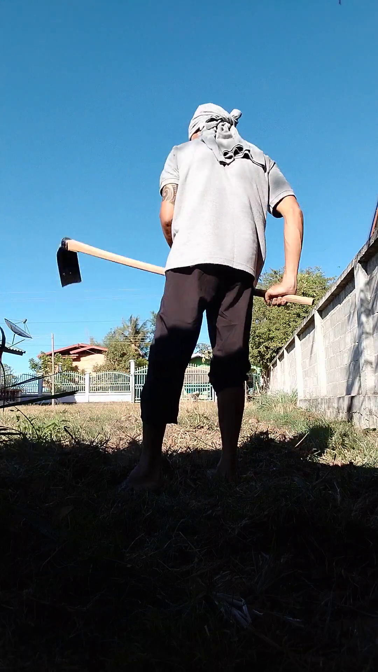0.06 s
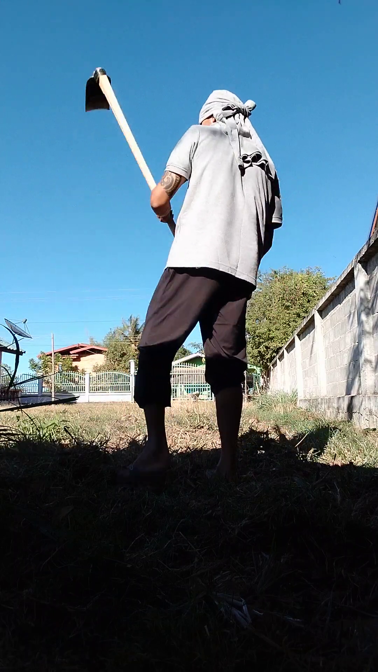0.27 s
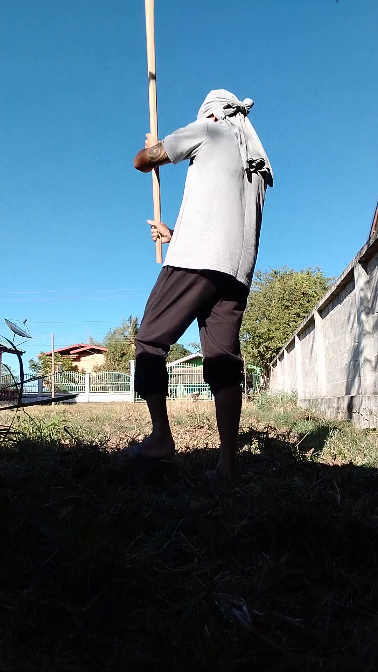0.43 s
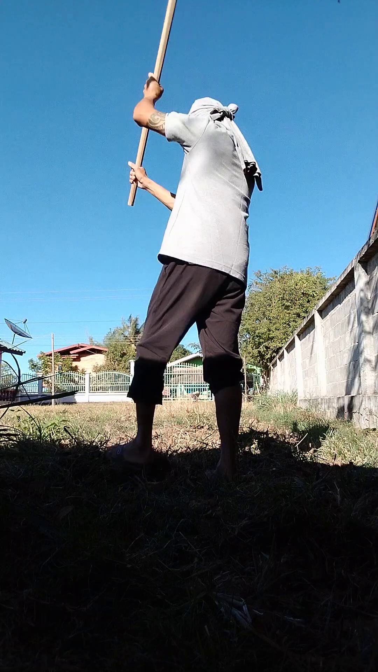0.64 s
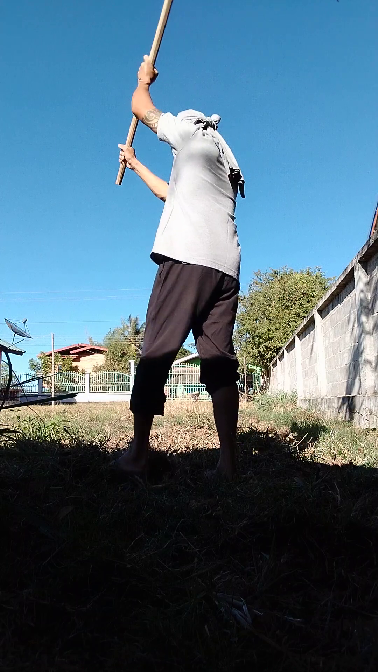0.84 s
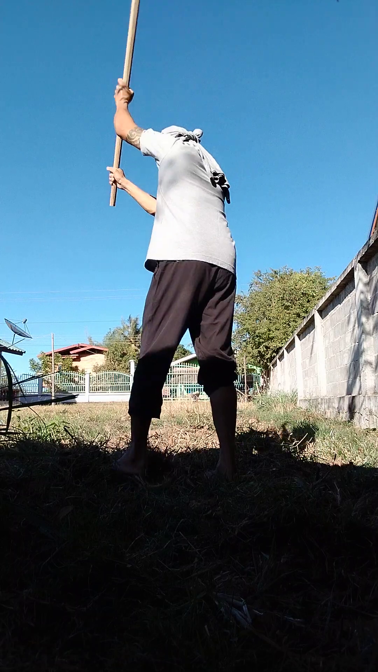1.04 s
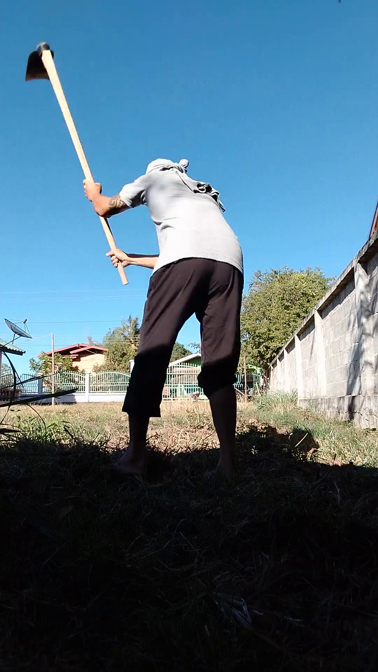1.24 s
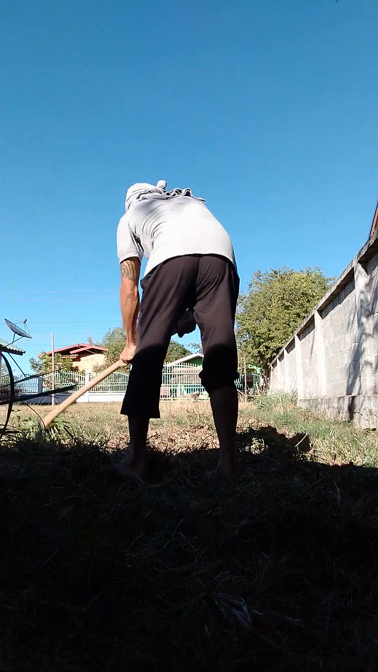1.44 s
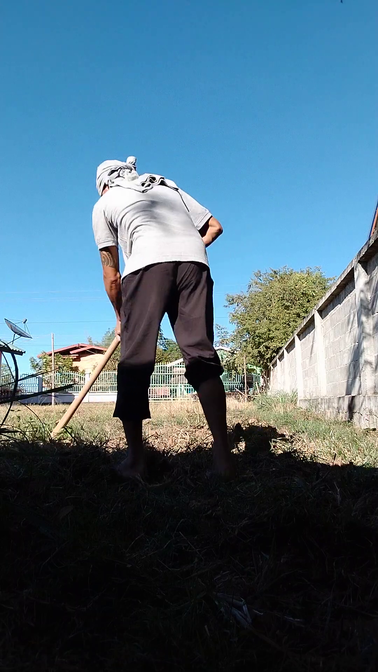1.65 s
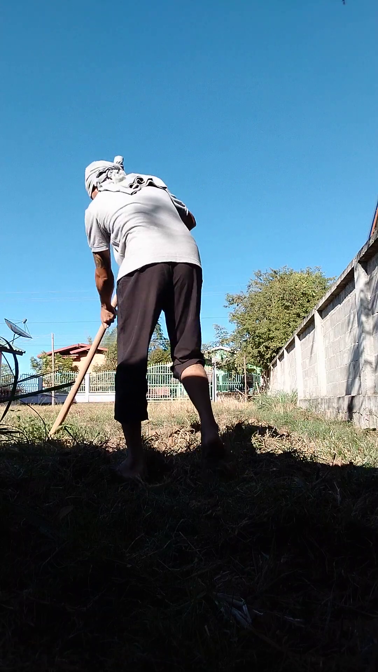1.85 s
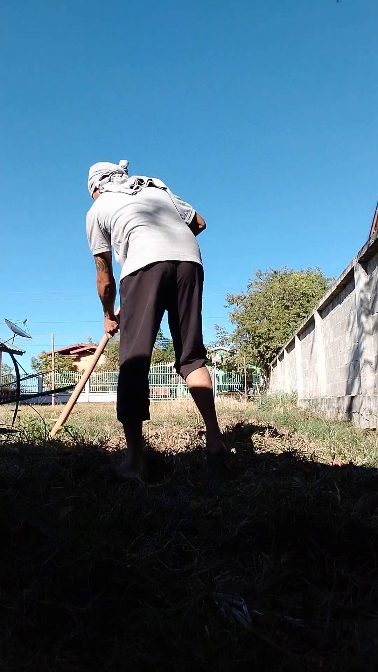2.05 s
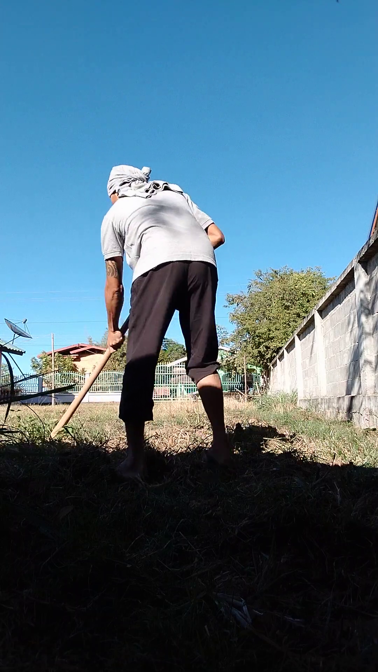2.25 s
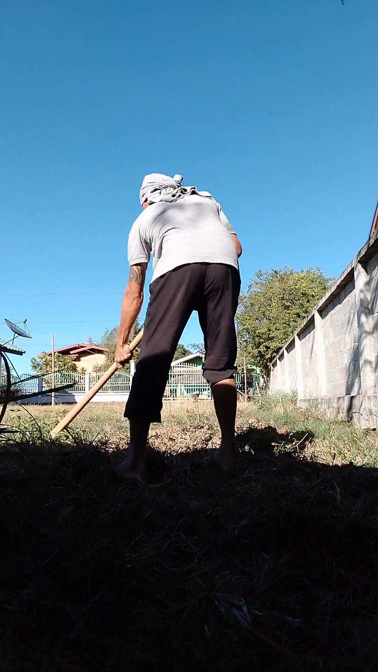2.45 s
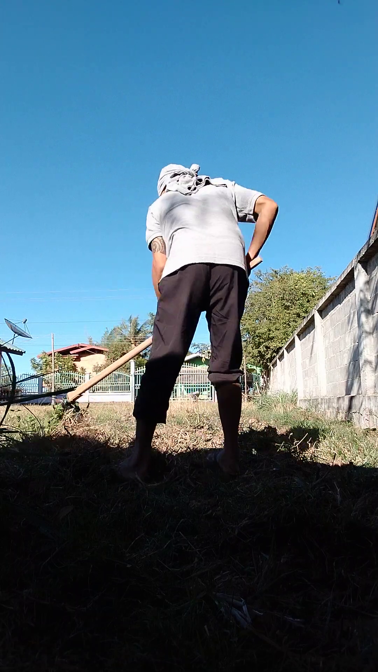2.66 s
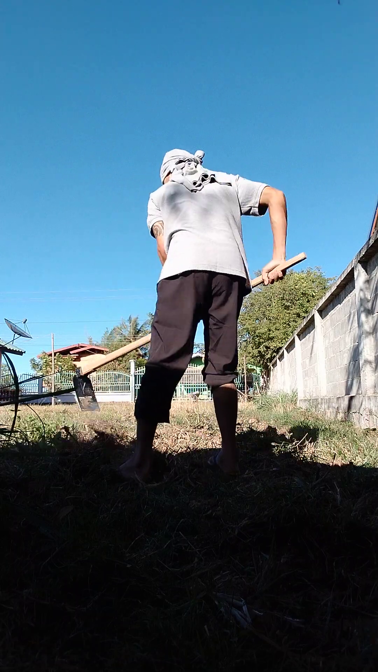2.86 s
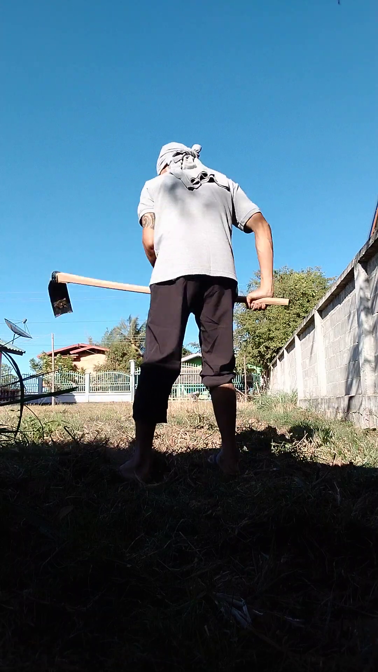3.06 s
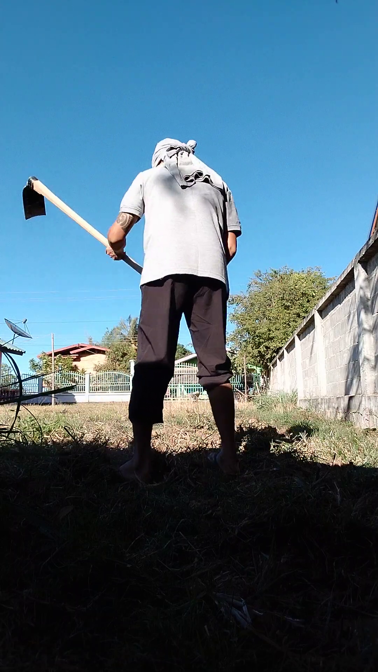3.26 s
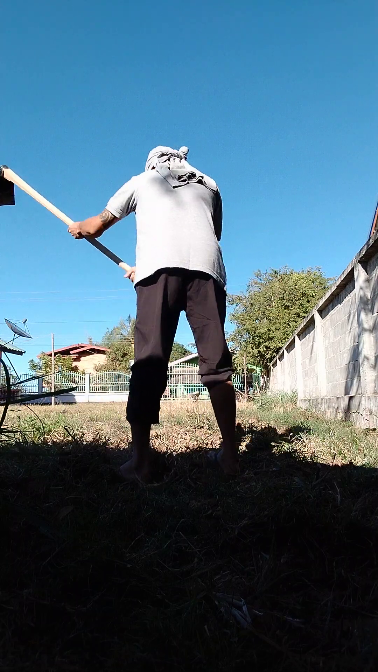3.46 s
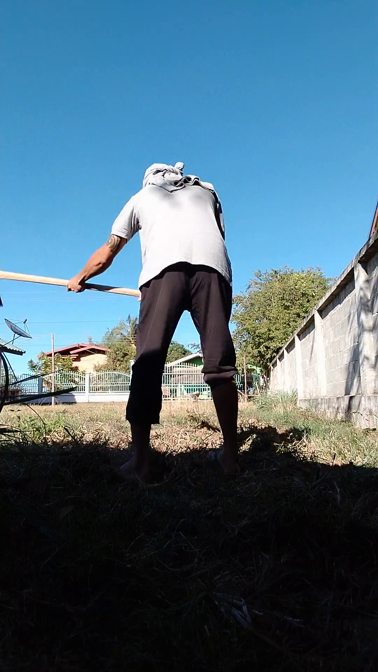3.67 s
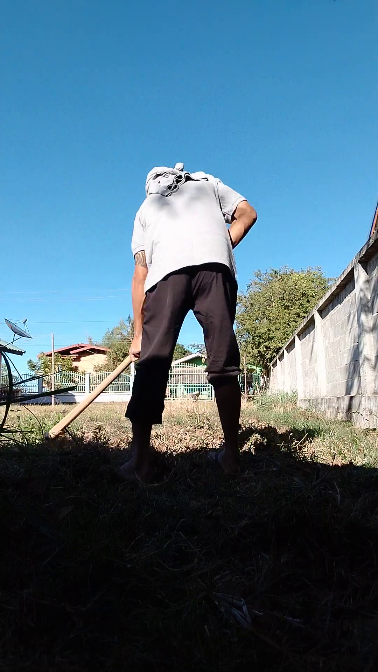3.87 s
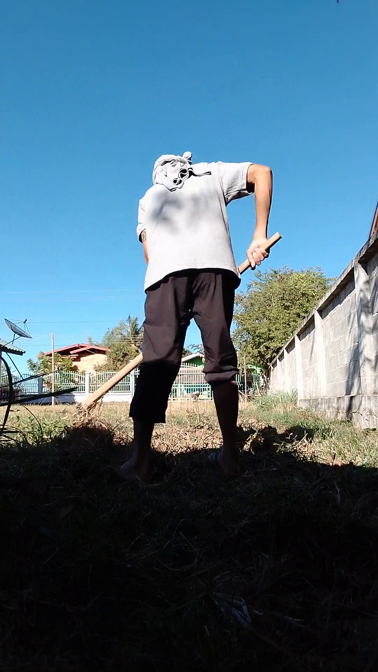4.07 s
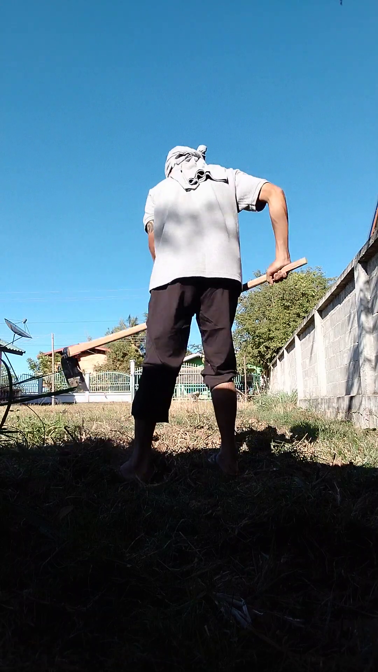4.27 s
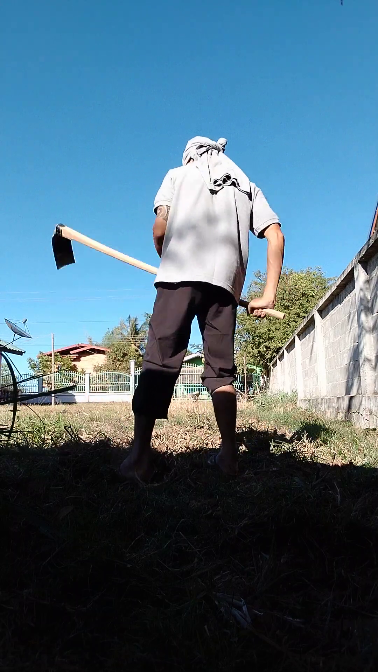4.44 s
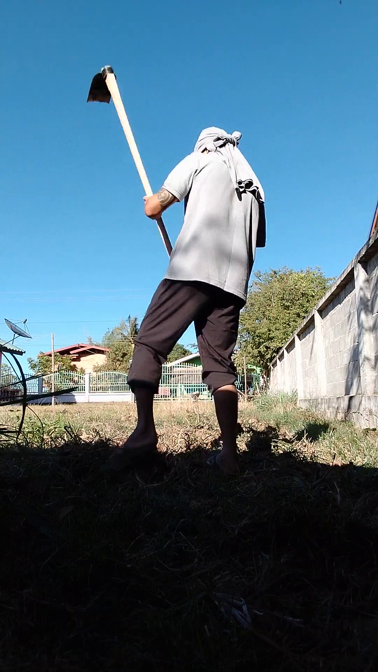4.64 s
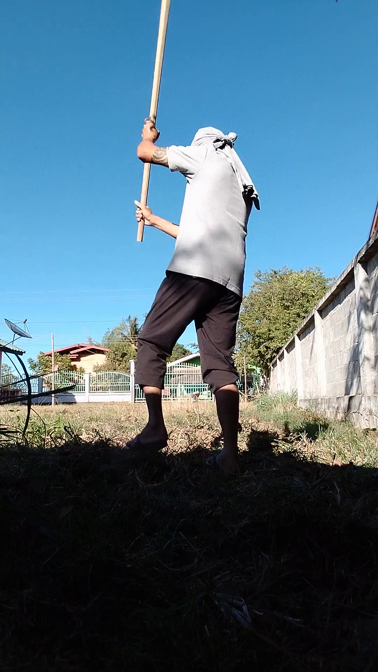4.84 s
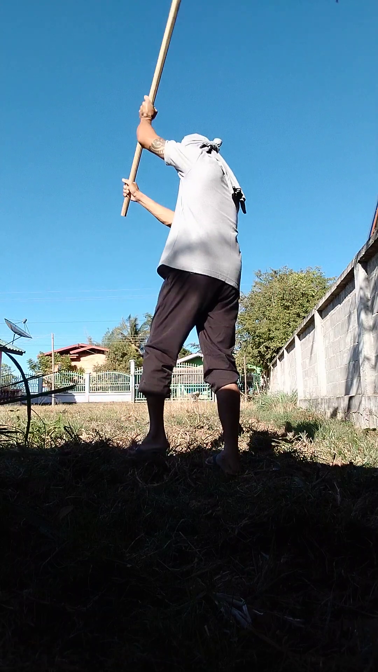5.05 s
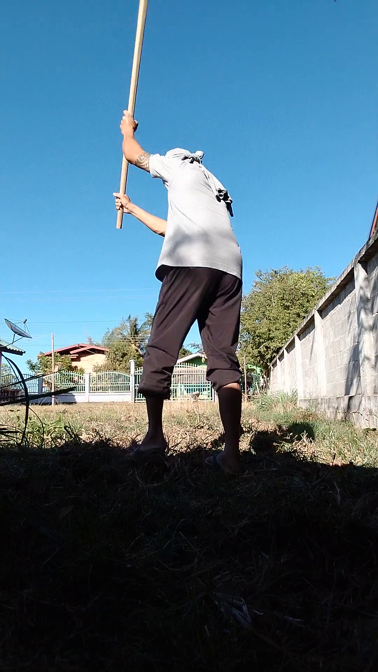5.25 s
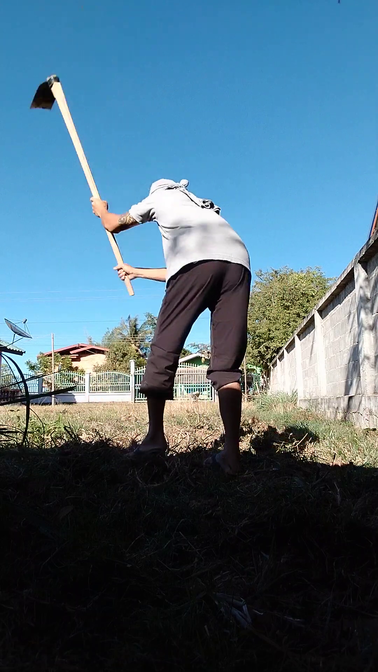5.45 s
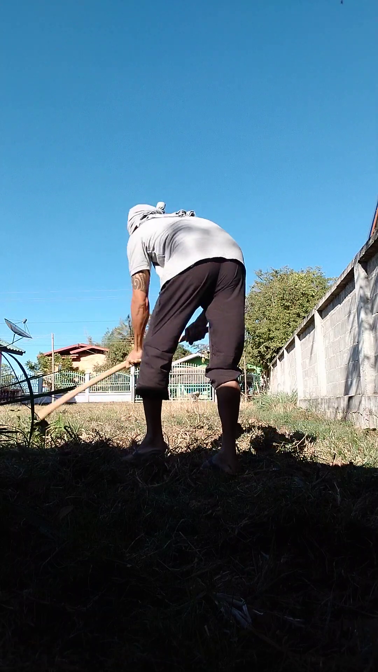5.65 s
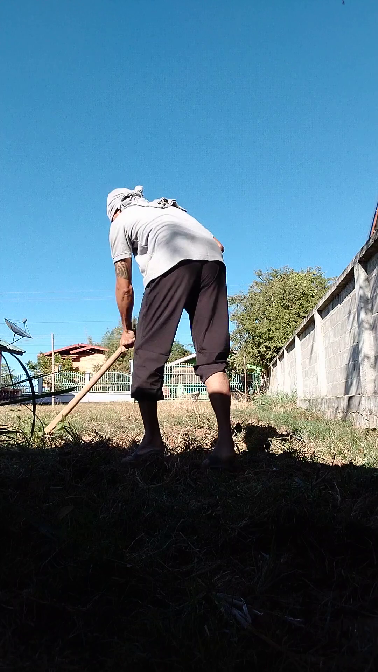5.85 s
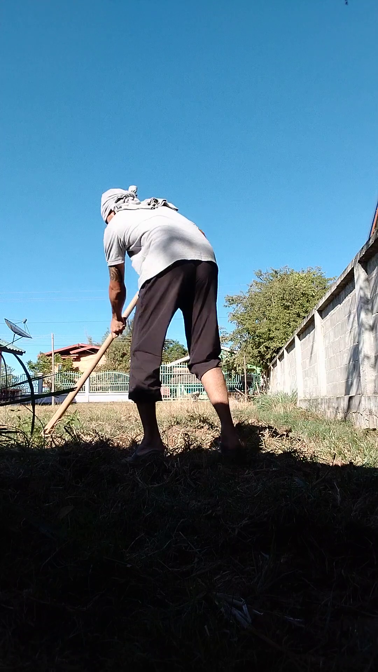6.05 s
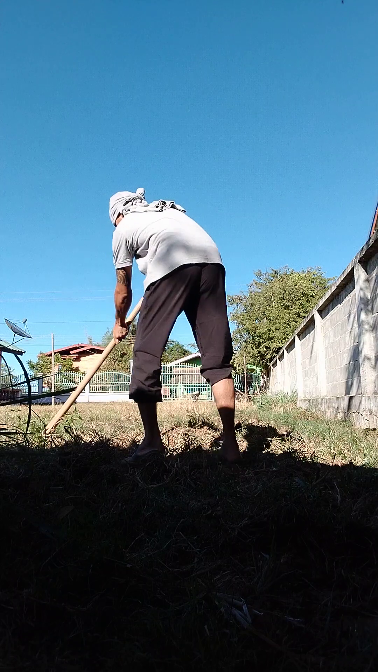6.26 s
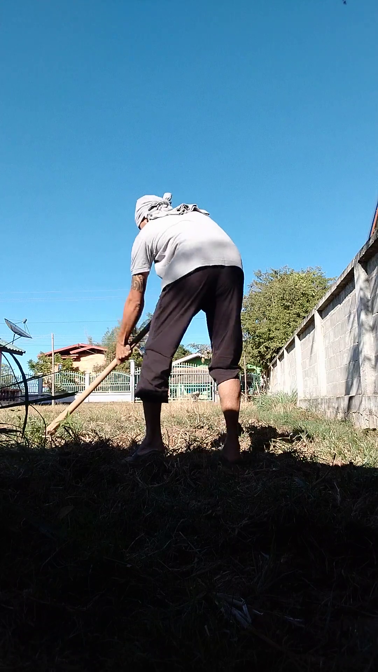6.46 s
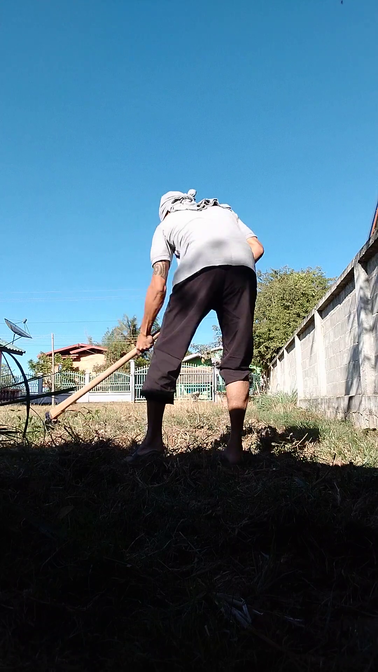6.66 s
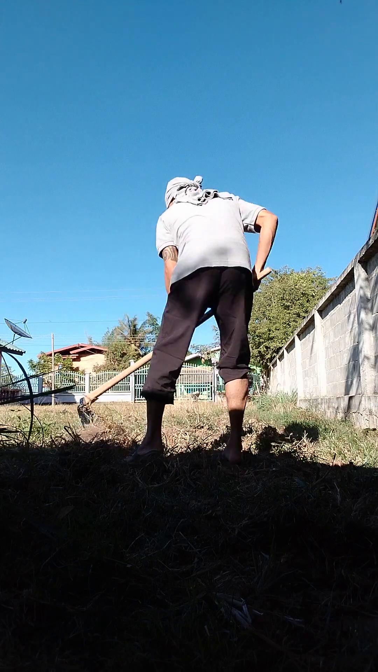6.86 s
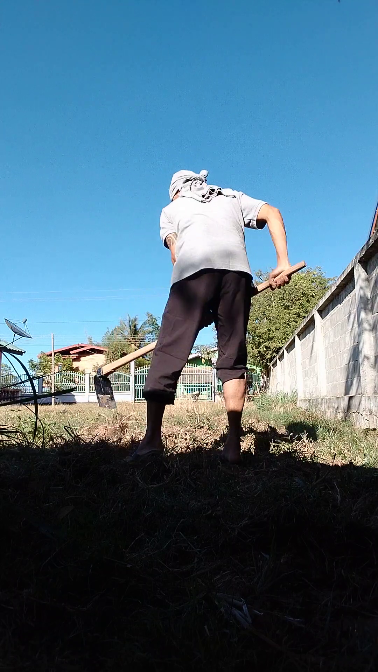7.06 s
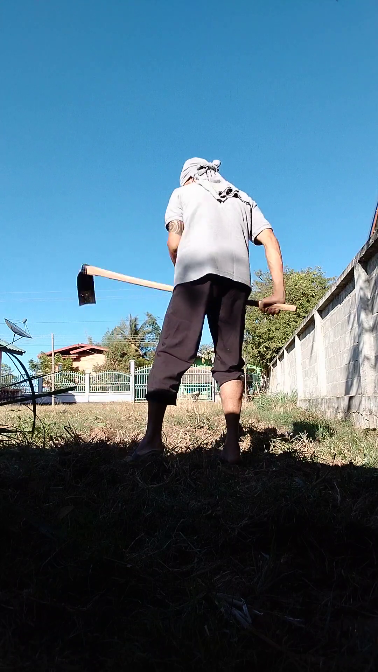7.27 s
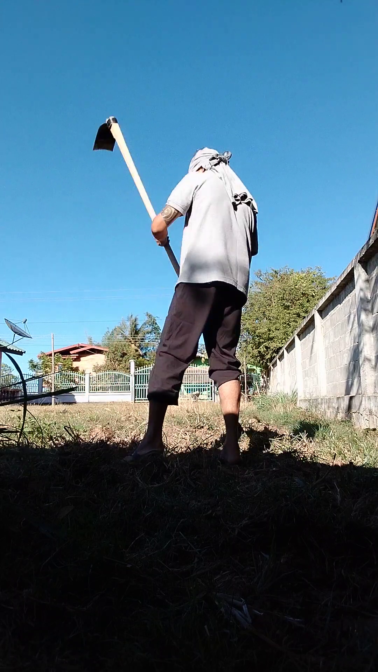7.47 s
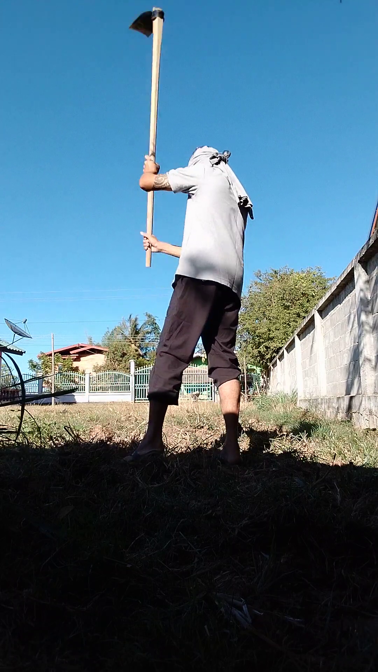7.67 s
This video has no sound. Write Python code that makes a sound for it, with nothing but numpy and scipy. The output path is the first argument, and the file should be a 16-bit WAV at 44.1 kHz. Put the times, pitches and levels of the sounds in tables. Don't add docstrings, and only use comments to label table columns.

```python
import sys
import numpy as np
from scipy import signal
from scipy.fft import rfft, irfft, next_fast_len
from scipy.io import wavfile
from scipy.ndimage import uniform_filter1d

SR = 44100
rng = np.random.default_rng(int(sys.argv[2]) if len(sys.argv) > 2 else 0)


def generate_wav(sig):
    pcm = np.round(np.clip(np.atleast_2d(sig).T, -1, 1) * 32767).astype(np.int16)
    wavfile.write(sys.argv[1], SR, pcm)


def volts(x):
    e = np.asarray(x, float) / 20
    return 10 ** e


N = 340011
T = np.arange(N) / SR

# pitch_hz, level_db, free_t60_s
BLADE_LOW = [(366, -1.5, 0.14), (537, -8.5, 0.22), (806, -6, 0.99), (1023, -3.5, 0.24), (1405, -10, 0.14),
             (1680, -17.5, 0.49), (1680, -5, 0.17)]
BLADE_HIGH = [(2867, -5.5, 0.57), (3445, -8.5, 0.56), (3810, -2.5, 0.13), (4530, -4, 0.37),
              (5330, -2, 0.23), (6800, 0.5, 0.29), (7710, -8, 0.13), (8940, 1.5, 0.058), (9350, 3, 0.33),
              (9580, -2.5, 0.28)]
# pitch_hz, level_db (per Hz)
CLOD = [(150, -29.5), (250, -3), (795, -2), (1140, -6.5), (1230, -2), (1650, -2.5), (2000, -15.5),
        (2600, -36.5), (4400, -120)]


def colour(x, spectrum):
    size = next_fast_len(x.shape[-1])
    hz, db = np.transpose(spectrum)
    bins_hz = np.arange(size // 2 + 1) * SR / size
    gain = volts(np.interp(np.log(bins_hz + 1), np.log(hz), db))
    return irfft(rfft(x, size) * gain, size)[..., :x.shape[-1]]


def unit(x):
    return x / np.sqrt(np.mean(x ** 2, axis=-1, keepdims=True))


def fade(t, t60):
    return np.exp(-np.log(1000) * t / np.maximum(t60, .004))


def ring(x, hz, t60):
    r = fade(1 / SR, t60)
    w = 2 * np.pi * hz / SR
    return signal.lfilter([0, np.sin(w)], [1, -2 * r * np.cos(w), r * r], x)


def walk(rate):
    k = int(SR / rate)
    steps = np.repeat(rng.standard_normal(N // k + 1), k)
    return 1.5 * uniform_filter1d(uniform_filter1d(steps, k), k)[:N]


def loud_grains(shape, spread_db):
    return volts(spread_db * np.minimum(rng.exponential(size=shape), 6))


def grains(shape, spread_db):
    return rng.standard_normal(shape) * loud_grains(shape, spread_db)


def patchy(spread_db, rate):
    out = 0
    for hz in 250 * np.sqrt(2) ** np.arange(13):
        band = [(hz / 1.5, -60), (hz / 1.3, -6), (hz, 0), (hz * 1.3, -6), (hz * 1.5, -60)]
        out = out + colour(rng.standard_normal(N), band) * volts(spread_db(hz) * walk(rate))
    return out


def add(out, s, piece):
    i = max(int(s * SR), 0)
    out[i:i + len(piece)] += piece[:N - i]


def bites():
    # start_s, grit_peak_db, clods_db (re grit), t60_s, ring_db (re grit)
    chops = [(1.5812, -32.5, -2.5, 0.49, -42.5), (1.5852, -30, -6, 0.076, -29.5),
             (1.5918, -8, -0.5, 0.049, -8), (1.5984, -13.5, 3, 0.025, -26.5), (1.607, -30, 9.5, 0.085, -25),
             (3.9425, -36, -4, 0.06, -14), (3.9618, -21.5, 3.5, 0.076, -14), (3.9665, -13, 0, 0.023, -38.5),
             (3.9691, -10, -9, 0.052, -18), (3.975, -25.5, 8.5, 0.071, -17),
             (3.990, -29.5, 5.5, 0.069, -28), (5.818, -36, -2, .1, -30), (5.8235, -16.5, -4, 0.071, -32.5),
             (5.829, -3, -24.5, 0.035, -13.5), (5.833, -10.5, 6.5, 0.014, -15.5),
             (5.841, -32.5, 6.5, 0.044, -0.5)]
    # start_s, peak_db, t60_s
    ticks = [(0.4783, -44, 0.027), (0.66, -48, .035), (1.8849, -26, 0.035), (2.5985, -51.5, .022),
             (4.0394, -41, 0.15), (4.1873, -40, 0.03), (4.2844, -53, .028), (5.0589, -50, 0.028),
             (5.3883, -51, .02), (5.905, -44, 0.08), (6.0117, -36, .021), (6.0474, -29, 0.022),
             (6.1032, -31, 0.015), (6.1468, -35, .025), (6.1644, -35, .05), (6.3683, -44.5, 0.036),
             (6.4552, -33, 0.03), (6.8997, -50, .015), (6.9944, -41, .023), (7.11, -47, 0.031),
             (7.255, -54, 0.024)]
    # start_s, peak_db, t60_s
    lumps = [(1.6752, -47, 0.045), (2.2526, -54, 0.034), (2.6765, -32.5, 0.081), (2.7419, -28, 0.026),
             (2.827, -49.5, .02), (2.8943, -35.5, 0.065), (6.1238, -31.5, 0.039), (6.1902, -39, 0.044),
             (6.2687, -46, 0.09), (6.348, -60, 0.021), (6.6977, -53, 0.02), (6.8142, -44, .03),
             (6.9294, -46, .039)]
    # pitch_hz, level_db (per Hz)
    grit_colour = [(1060, -42), (1800, -10), (2940, -5.5), (3140, -4.5), (3510, -1), (4310, -6), (6950, -4),
                   (7530, -8), (9050, -3.5), (10400, -15.5), (13500, -43.5), (22000, -120)]
    tick_clod_db, tick_ring_db, lump_clod_db, lump_ring_db = -21, -16, -1, -14
    free_in_soil, free_loose = 0.14, .24
    rows = [(*row, free_in_soil) for row in chops]
    rows += [(s, db, tick_clod_db, t60, tick_ring_db, free_loose) for s, db, t60 in ticks]
    rows += [(s, db, lump_clod_db, t60, lump_ring_db, free_loose) for s, db, t60 in lumps]

    t = T[:SR // 5]
    hz, mode_db, free_t60 = np.transpose(BLADE_LOW + BLADE_HIGH)[:, :, None]
    is_low = hz < BLADE_HIGH[0][0]
    shape = (len(rows), len(t))
    grit = unit(colour(grains(shape, 1.9), grit_colour[:-2] + [(12500, -20)]))
    clod = unit(colour(rng.standard_normal(shape), CLOD))
    place_db, detune = rng.standard_normal((len(rows), 2, len(hz), 1)).swapaxes(0, 1)
    out = np.zeros(N)
    rise = 1 - np.exp(-t / .0003)
    for k, (s, db, clod_db, t60, ring_db, free) in enumerate(rows):
        dust = volts(-4.0) * fade(t, 0.039 * t60) + fade(t, t60) + volts(-16) * fade(t, 5.8 * t60)
        soil = volts(-2.0) * (grit[k] * dust + volts(clod_db) * clod[k] * fade(t, t60))
        gain = volts(ring_db + mode_db + 4 * place_db[k] + is_low * clod_db)
        tones = np.sin(2 * np.pi * hz * (1 + 0.0082 * detune[k]) * t)
        blade = (gain * fade(t, free * free_t60) * tones).sum(axis=0)
        add(out, s, volts(db) * rise * (soil + blade) * fade(t, 0.23))
    return out


def thumps():
    # start_s, peak_db, pitch_hz
    blows = [(0.027, -33, 88), (0.076, -42, 80), (0.105, -39, 94), (0.14, -41.5, 116), (1.592, -33, 422),
             (1.6002, -6, 289), (2.681, -33, 340), (2.705, -40, 480), (2.75, -38.5, 287), (2.803, -41, 300),
             (2.828, -40, 330), (2.85, -34.5, 253), (3.148, -39.5, 189), (3.99, -21.5, 280),
             (4.011, -38, 167), (5.8326, -6, 235), (5.8375, -15, 330)]
    # start_s, peak_db, pitch_hz
    wood_knocks = [(1.838, -40, 787), (1.846, -45, 970), (1.8905, -35, 638), (1.89, -31, 785),
                   (1.892, -37, 980), (1.92, -47, 740), (2.254, -52.5, 1030), (3.964, -29, 1116),
                   (5.8292, -9.5, 1587), (5.8297, -4, 3540), (5.8338, -6, 3390), (5.836, -18.5, 479),
                   (5.840, -31, 367), (5.925, -50, 184), (5.987, -51.5, 150), (5.995, -43, 890),
                   (6.272, -42.5, 770), (6.735, -51, 330), (6.78, -53, 288)]
    # chop_s, peak_db
    ground = [
        (1.594, -32.5),
        (3.973, -39),
        (5.829, -35.5),
    ]
    ground_hz, ground_lag_s, rebound_lag_s, rebound_db = 55, .04, .15, -12
    blow_cycles, wood_cycles, ground_cycles, rebound_cycles = .55, 3.6, .8, 2.4
    rows = [(*row, blow_cycles) for row in blows]
    rows += [(*row, wood_cycles) for row in wood_knocks]
    rows += [(s + ground_lag_s, db, ground_hz, ground_cycles) for s, db in ground]
    rows += [(s + rebound_lag_s, db + rebound_db, ground_hz, rebound_cycles) for s, db in ground]

    out = np.zeros(N + SR)
    for s, db, hz, cycles in rows:
        turns = np.arange(-3 * cycles, 6 * cycles, hz / SR)
        stretch = np.where(turns > 0, 1.6, 1)
        swing = -np.sin(2 * np.pi * turns) * np.exp(-(turns / cycles / stretch) ** 2)
        i = SR + int((s + turns[0] / hz) * SR)
        out[i:i + len(swing)] += volts(db) * swing
    return out[SR:]


def held(s, hold, t60):
    attack_s = .02
    return np.clip((T - s) / attack_s + 1, 0, 1) * fade(np.maximum(T - s - hold, 0), t60)


def crumble(push):
    crumbs_per_s, crumb_db, crumb_t60_s = 400, -6, .04
    out = 0
    pitches = 330 * 1.14 ** np.arange(22)
    for hz in pitches:
        hits = rng.random(N) < crumbs_per_s / len(pitches) / SR
        taps = hits * volts(4 * rng.standard_normal(N))
        out = out + ring(taps * push, hz, crumb_t60_s)
    return volts(crumb_db) * out


def drags():
    # start_s, hold_s, grit_db, clods_db, t60_s (of the trailing grit)
    pulls = [
        (2.68, 0.069, -47, -49.5, .4),
        (2.76, 0.16, -51, -58, 0.26),
        (5.86, .19, -54.5, -56.5, 0.37),
        (6.06, 0.062, -55, -65, 0.15),
        (6.163, .045, -45, -52, .07),
        (6.69, 0.16, -61, -58, 0.3),
        (6.89, 0.084, -53.5, -59.5, 0.32),
    ]
    # start_s, hold_s, grit_db, clods_db, t60_s (of the trailing grit)
    falls = [(1.61, 0.02, -58, -50.5, 0.25), (1.82, 0.029, -58, -60, 0.26), (1.895, .015, -64, -55, 0.4),
             (2.63, 0.034, -53, -65, 0.33), (3.04, 0.14, -58, -74.5, 0.57), (4.0, 0.022, -49, -53, 0.64),
             (4.1, 0.22, -53.5, -66.5, 0.85), (4.25, 0.037, -63, -66.5, 0.24),
             (6.75, 0.25, -52.5, -75, 1.33), (7.1, .07, -59, -72, .5), (7.24, .02, -77, -72, .1)]
    # pitch_hz, level_db (per Hz)
    dust_colour = [(1060, -31), (1800, -16.5), (2240, -15), (2580, -7.5), (3310, -5.5), (4710, -9.5),
                   (7750, -6), (9180, -2.5), (10400, -12.5), (13500, -60), (22000, -120)]
    # pitch_hz, level_db
    drag_tilt = [(10400, 0), (12500, -2)]
    # pitch_hz, level_db
    fall_tilt = [(1500, -6), (8000, 3)]
    clod_t60_s, drag_ring_db, fall_ring_db, taps_per_s = 0.12, 1, -10, 130

    crumbs = patchy(lambda hz: 2.5, 60) * loud_grains(N, 2.1)
    grit = unit(colour(crumbs, dust_colour[:-2]))
    clod = unit(colour(crumbs, CLOD))
    slip = volts(2.0 * walk(120))
    dragged = (pulls, drag_ring_db, colour(grit, drag_tilt))
    fallen = (falls, fall_ring_db, unit(colour(grit, fall_tilt)))
    soil, rub, push = 0, 0, 0
    for rows, ring_db, sand in (dragged, fallen):
        for s, hold, db, clod_db, t60 in rows:
            fine = volts(db) * held(s, hold, t60)
            coarse = volts(clod_db) * held(s, hold, clod_t60_s)
            soil = soil + fine * sand + coarse * clod
            rub = rub + fine * volts(ring_db - 4.0)
            push = push + coarse
    out = soil * slip + crumble(push * slip)
    for hz, db, t60 in BLADE_LOW + BLADE_HIGH:
        taps = rub * (rng.random(N) < taps_per_s / SR) * rng.standard_normal(N)
        out = out + volts(db) * ring(taps, hz, t60 / 8)
    return out


def ping():
    # start_s, pitch_hz, peak_db, t60_s
    pings = [(7.357, 3106, -46.5, 0.28), (7.357, 7558, -35.5, 0.093), (7.357, 8200, -48, .06),
             (2.895, 750, -44, 0.22), (2.895, 6800, -43, 0.068), (2.895, 9647, -55, 0.61),
             (2.896, 1405, -44, 0.16), (2.818, 1800, -44, 0.1), (4.28, 782, -53, 0.27),
             (4.279, 5510, -44, 0.12), (4.286, 6821, -53, 0.33), (4.286, 3810, -53, 0.2),
             (6.928, 6800, -48, .25), (6.928, 1770, -40, 0.076), (7.10, 3480, -52.5, 0.28),
             (7.14, 772, -55, 0.27), (7.255, 6950, -44.5, .05), (6.722, 3840, -46.5, .05),
             (7.357, 14700, -49, .15)]
    # start_s, pitch_hz, peak_db, t60_s
    soil_taps = [(1.675, 1650, -48, .08), (1.745, 2000, -53, .1), (1.785, 900, -54, .08),
                 (1.835, 1330, -49, .1), (1.835, 1750, -51, .1), (1.886, 1750, -40, .07),
                 (1.886, 1320, -43, .07), (2.695, 3500, -44, .04), (2.727, 2550, -44, .06),
                 (2.743, 3700, -34, .04), (2.743, 6700, -35, .04), (2.743, 8400, -38, .06),
                 (2.743, 9700, -38, .05), (2.743, 1700, -37, .05), (2.787, 3500, -41, .05),
                 (2.88, 5600, -44, .05), (3.942, 1300, -46, .05), (3.942, 600, -44, .05),
                 (4.035, 1800, -47, .08), (4.105, 1420, -50, .15), (4.108, 3000, -50, .08),
                 (4.158, 1700, -50, .15), (4.19, 1700, -47, .05), (4.19, 1000, -50, .06),
                 (4.25, 900, -51, .1), (4.26, 2100, -52, .12), (4.28, 1420, -49, .15),
                 (5.826, 1200, -16, .04), (5.8295, 9000, -10, .015), (5.838, 400, -22, .08),
                 (6.018, 3100, -41, .05), (6.031, 3100, -42, .05), (6.049, 1600, -43, .06),
                 (6.131, 1600, -40, .04), (6.165, 1600, -41, .08), (6.185, 780, -42, .1),
                 (6.684, 500, -50, .08), (6.70, 950, -45, .06), (6.722, 520, -46, .07),
                 (6.815, 2900, -47, .05), (6.899, 3000, -45, .04), (6.935, 780, -47, .12),
                 (6.96, 1750, -48, .08), (6.975, 4550, -49, .07), (6.99, 3000, -46, .07)]
    # start_s, peak_db
    skips = [(6.041, -42), (6.066, -46), (6.085, -46), (6.1035, -32), (6.1245, -35), (6.134, -39),
             (6.148, -35), (6.152, -38), (6.163, -38), (6.1665, -35), (6.178, -39), (6.19, -37), (6.2, -43)]
    # pitch_hz, level_db, t60_s
    skip_modes = [(9100, 0, .03), (9500, -5, .02), (5200, -8, .015), (3500, -8, .02)]
    rough_hz, rough_rad = 70, 1.2
    rows = pings + soil_taps
    rows += [(s, hz, db + mode_db, t60) for s, db in skips for hz, mode_db, t60 in skip_modes]
    out, t = np.zeros(N), T[:SR // 3]
    for k, (s, hz, db, t60) in enumerate(rows):
        in_soil = k >= len(pings)
        shake = in_soil * np.sin(2 * np.pi * (rough_hz + k) * t + k)
        tone = np.sin(2 * np.pi * hz * t + rough_rad * shake)
        add(out, s, volts(db) * fade(t, t60) * (1 - np.exp(-t * hz / 2)) * tone)
    return out


def rubs():
    # start_s, length_s, pitch_hz, level_db (rms)
    strokes = [(1.65, .045, 2850, -50), (1.66, .05, 1700, -57), (1.72, .04, 2850, -55),
               (1.70, .1, 1950, -58), (1.78, .04, 850, -60), (1.822, .04, 820, -44),
               (1.884, .045, 730, -42), (1.92, .085, 760, -59), (2.655, .07, 900, -48),
               (2.66, .06, 450, -50), (2.74, .05, 1700, -50), (2.86, .05, 3000, -52),
               (2.885, .05, 1100, -50), (3.958, .045, 550, -31), (4.03, .04, 3000, -52),
               (4.145, .035, 4000, -58), (4.235, .07, 900, -58), (4.2, .13, 5600, -56),
               (5.826, .014, 2200, -24), (5.83, .02, 380, -30), (5.89, .045, 3000, -47),
               (5.96, .04, 2600, -52), (6.12, .025, 1300, -46), (6.158, .07, 3200, -43),
               (6.16, .07, 1700, -46), (6.165, .06, 5000, -47), (6.265, .03, 2000, -55),
               (6.453, .01, 6500, -38), (6.68, .19, 400, -56), (6.69, .15, 1100, -56),
               (6.92, .065, 780, -56), (6.91, .11, 1750, -56), (6.92, .06, 3200, -53),
               (6.94, .04, 5200, -54), (6.78, .13, 600, -56), (6.72, .19, 230, -56), (5.9, .03, 900, -50),
               (6.035, .03, 1200, -50), (6.16, .06, 750, -49)]
    near, far = 1 + .12, 1 + 4 * .12
    out = np.zeros(N)
    for s, length, hz, db in strokes:
        u = T[:SR // 5] / length
        band = [(hz / far, -40), (hz / near, -6), (hz, 0), (hz * near, -6), (hz * far, -40)]
        noise = unit(colour(grains(len(u), 2.0), band))
        swell = np.sqrt(np.sin(np.pi * np.minimum(u, 1) ** .7) ** 2 + 1e-12)
        add(out, s, volts(db) * noise * swell)
    return out


def swish():
    # chop_s, level_db, grow_s (time to grow 20 dB)
    swings = [
        (1.585, -58, .4),
        (2.67, -60, .15),
        (5.82, -60, 1.2),
    ]
    # pitch_hz, level_db (per Hz)
    air_colour = [(200, -30), (350, -3), (700, 0), (1400, -4), (2500, -20), (5000, -60)]
    air = unit(colour(rng.standard_normal(N), air_colour)) * volts(2.0 * walk(25))
    return air * sum(volts(db - 20 * np.abs(s - T) / grow) * (T < s) for s, db, grow in swings)


def rooster():
    # time_s, pitch_hz
    crow_pitch = [(4.75, 778), (4.86, 786), (4.9, 808), (4.99, 815), (5.09, 792), (5.135, 829), (5.28, 815),
                  (5.4, 824), (5.52, 790), (5.72, 772)]
    # start_s, length_s, first_tone_db, second_tone_db, rasp (share, 0-1)
    syllables = [
        (4.74, .26, -69, -59, .3),
        (5.08, .2, -54, -55, .5),
        (5.31, .18, -58, -59, .6),
        (5.45, .33, -66, -59, .8),
    ]
    rasp_hz = 78
    pitch = np.interp(T, *np.transpose(crow_pitch)) * (1 + 0.008 * walk(90))
    phase = 2 * np.pi * np.cumsum(pitch) / SR
    flap = np.sin(2 * np.pi * rasp_hz * T)
    first, second = 0, 0
    for s, length, first_db, second_db, rasp in syllables:
        effort = np.sin(np.pi * np.clip((T - s) / length, 0, 1) ** .85)
        first = first + volts(first_db) * effort ** 6
        second = second + volts(second_db) * effort ** .6 * (1 + rasp * flap)
    out = first * volts(1.2 * walk(40)) * np.sin(phase)
    out = out + second * volts(2.0 * walk(45) - 1.5) * np.sin(2 * phase)
    t = T[:SR // 4]
    echoes = volts(-31) * fade(t, .25) * rng.standard_normal(len(t))
    return out + signal.fftconvolve(out, echoes)[:N]


def birds():
    # start_s, length_s, pitch_hz, level_db
    chirps = [(.03, 0.027, 4710, -60), (0.153, 0.039, 5240, -60.5), (0.189, 0.08, 3990, -59),
              (0.269, 0.075, 4100, -62), (0.356, 0.058, 4050, -63), (0.393, 0.045, 3350, -65),
              (0.661, .03, 4670, -64), (0.858, 0.017, 3720, -64.5), (1.238, 0.021, 3790, -64),
              (1.397, 0.017, 4960, -63), (1.432, 0.04, 4120, -64), (2.2, 0.055, 3360, -66.5),
              (3.083, 0.041, 3350, -63), (3.193, 0.081, 4010, -68), (3.608, 0.05, 4530, -62),
              (3.645, 0.035, 3190, -62.5), (5.112, .04, 3830, -67.5), (6.4, .02, 4750, -62),
              (7.59, .03, 4930, -67.5), (7.675, 0.034, 4900, -56.5), (7.68, .03, 2790, -61)]
    slides = .02 * rng.standard_normal(len(chirps))
    waver, flutter = 1 + 0.022 * walk(250), volts(1.8 * walk(110))
    out = np.zeros(N)
    for (s, length, mid_hz, db), slide in zip(chirps, slides):
        u = np.arange(int(length * SR)) / (length * SR)
        hz = mid_hz * (1 + slide * (2 * u - 1)) * waver[int(s * SR):][:len(u)]
        add(out, s, volts(db + 10.0) * np.sin(np.pi * u) * np.sin(2 * np.pi * np.cumsum(hz) / SR))
    t = T[:SR // 4]
    trees = volts(-30.5) * fade(t, .22) * rng.standard_normal(len(t))
    return volts(-5.5) * out * flutter + signal.fftconvolve(out, trees)[:N]


def yard():
    # time_s, level_db
    floor_level = [(0.0, -53), (0.23, -55.5), (0.77, -57), (1.65, -54.5), (1.97, -62), (2.66, -61),
                   (3.41, -59.5), (3.99, -56), (4.3, -60.5), (5.15, -61.5), (5.76, -59.5), (5.86, -54),
                   (6.38, -62), (6.91, -62.5), (7.71, -58)]
    # pitch_hz, level_db (per Hz)
    hum_colour = [(15, -42.5), (25, -10), (48, 1), (103, -2), (130, -1), (195, -4), (227, -9), (400, -23.5),
                  (520, -48), (880, -120)]
    # pitch_hz, level_db (per Hz)
    hiss_colour = [(160, -22), (280, -5.5), (528, -1.5), (615, -5.5), (1210, -3.5), (1550, -8.5),
                   (2030, -4), (3010, -5.5), (3830, -1.5), (4810, -5), (8940, -5), (10400, -16),
                   (13500, -48.5), (22000, -120)]
    # pitch_hz, level_db
    motor_tones = [(102, -68.5), (200, -67.5)]
    hiss_db = np.interp(T, *np.transpose(floor_level))
    hum_db = -61 + 0.85 * (hiss_db + 60)
    hum = unit(colour(rng.standard_normal(N), hum_colour)) * volts(hum_db + 1.6 * walk(5))
    motor = 0
    for hz, db in motor_tones:
        motor = motor + volts(db + 1.8 * walk(6)) * unit(ring(rng.standard_normal(N), hz, .28))
    hiss = patchy(lambda hz: .7 + 1.2 * np.exp(-np.log(hz / 4200) ** 2 / 0.075), 16)
    return hum + motor + unit(colour(hiss, hiss_colour)) * volts(hiss_db + .5 * walk(3))


def scene():
    hoe = bites() + drags() + ping()
    t = T[:SR // 4]
    wall = volts(-54.5) * (t > .02) * fade(t, 0.34) * rng.standard_normal(len(t))
    echo = signal.fftconvolve(hoe, wall)[:N]
    background = rooster() + birds() + yard()
    return (hoe + echo + thumps() + rubs() + swish() + background)[None]


def top_cut(x):
    return signal.sosfilt(signal.butter(12, 15550, fs=SR, output="sos"), x)


def record(dry):
    # pitch_hz, level_db
    phone = [(18, -14.5), (42, -2), (10300, -5.5), (10700, -10), (10850, -29), (11200, -38.5),
             (12400, -41.5), (12700, -27), (15400, -25.5), (15700, -62)]
    rounded = np.tanh(.7 * dry) / .7
    return top_cut(colour(rounded, phone))


dry = scene()
out = record(dry)
generate_wav(out)
```